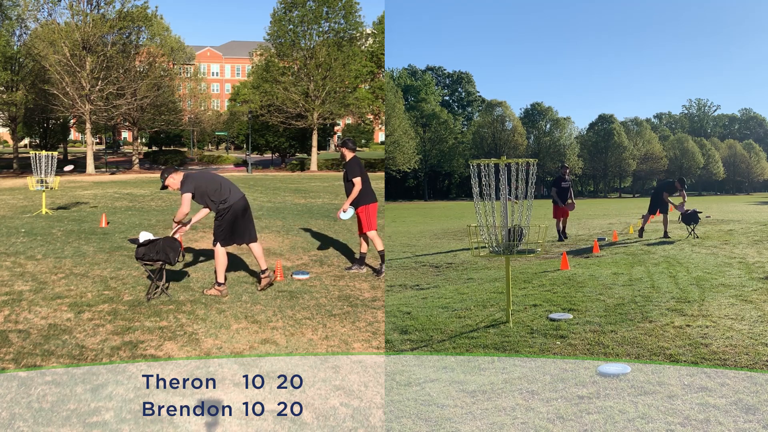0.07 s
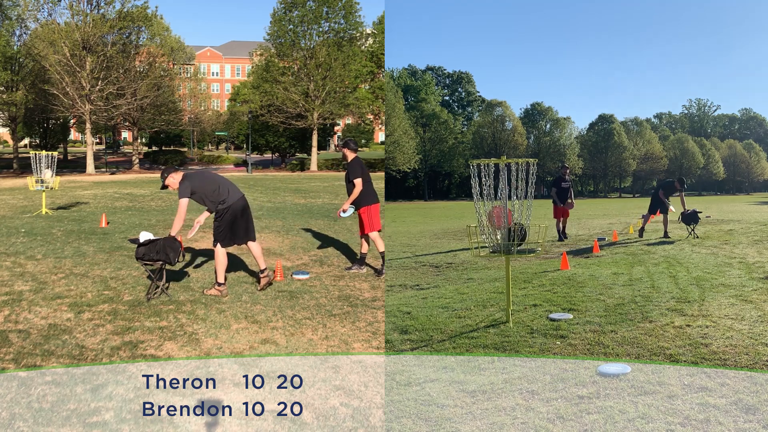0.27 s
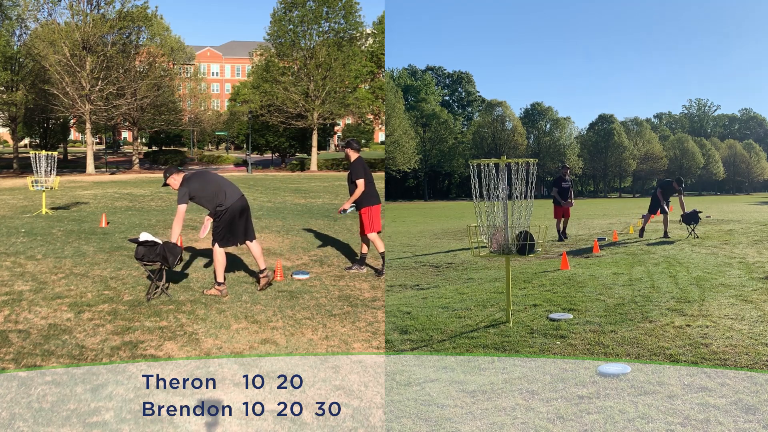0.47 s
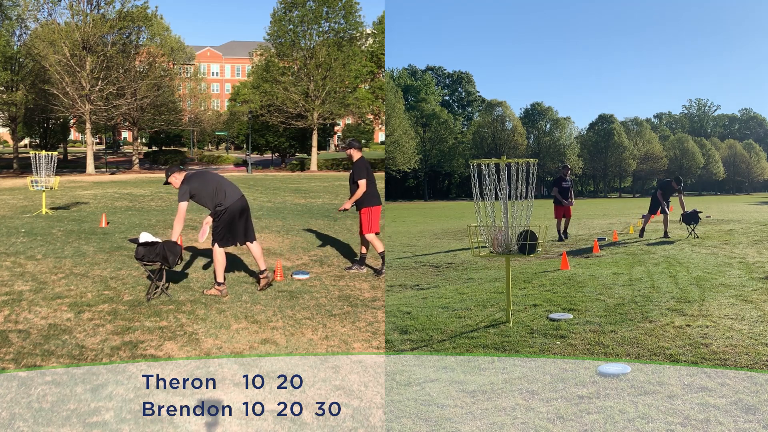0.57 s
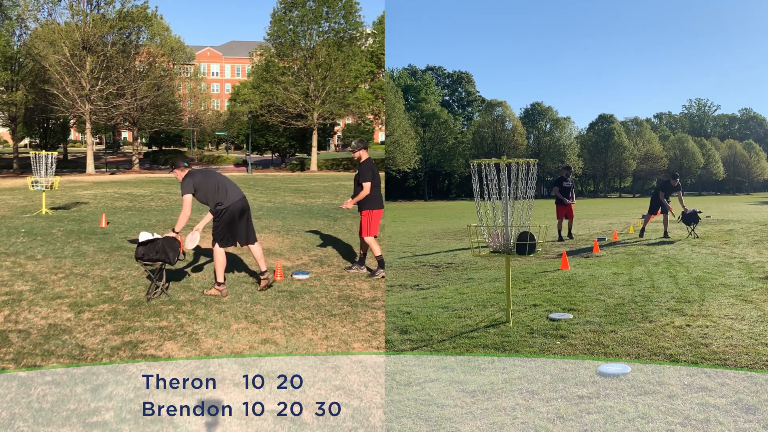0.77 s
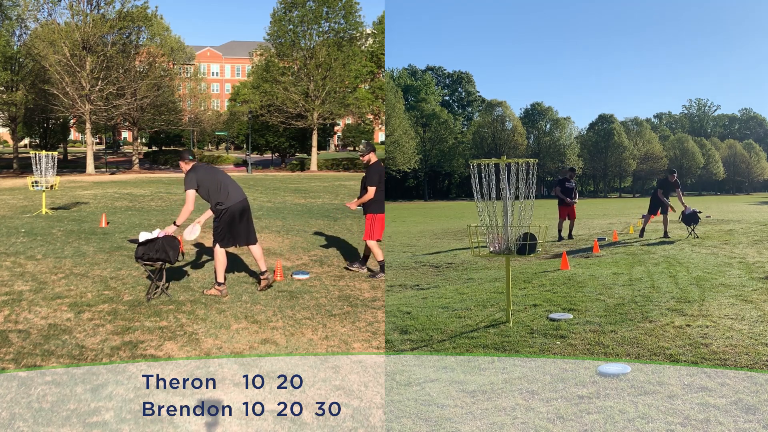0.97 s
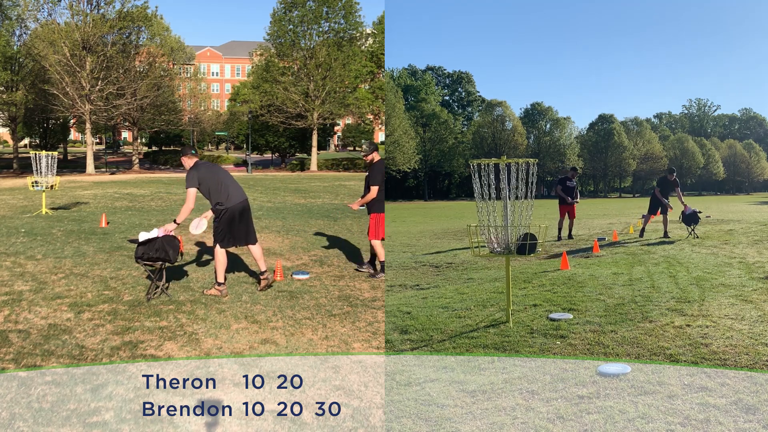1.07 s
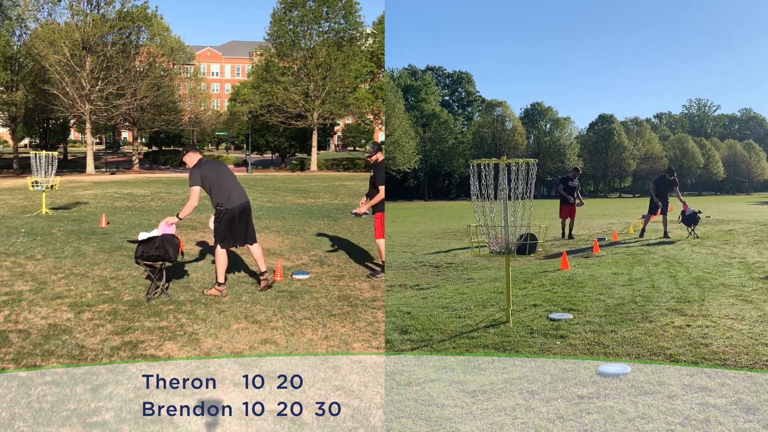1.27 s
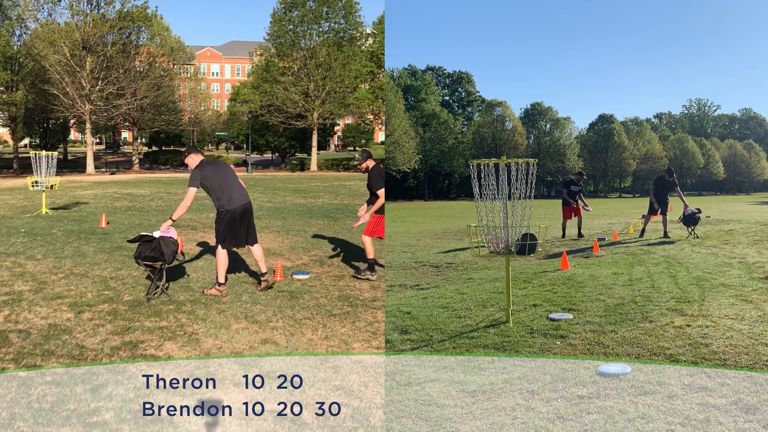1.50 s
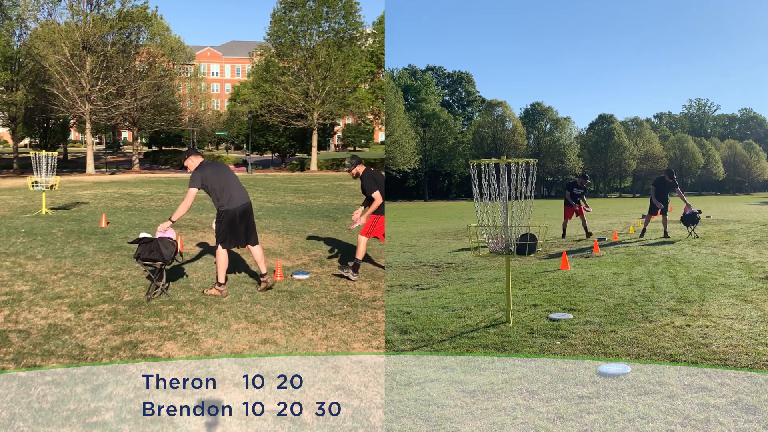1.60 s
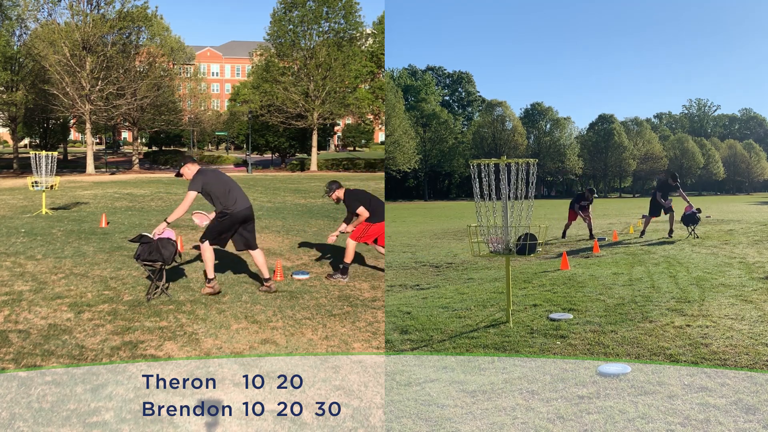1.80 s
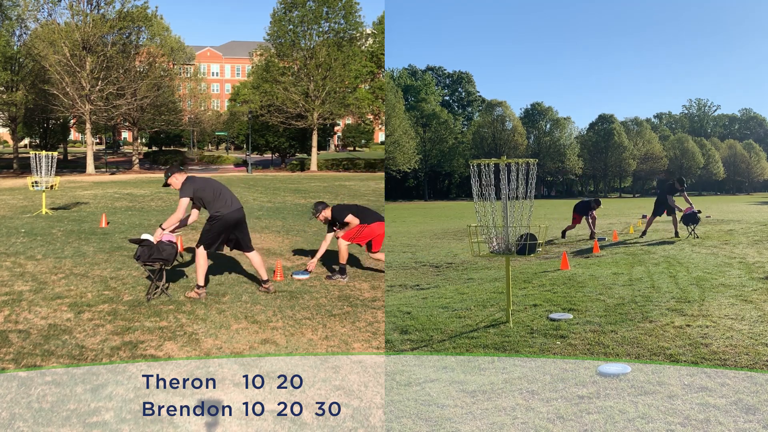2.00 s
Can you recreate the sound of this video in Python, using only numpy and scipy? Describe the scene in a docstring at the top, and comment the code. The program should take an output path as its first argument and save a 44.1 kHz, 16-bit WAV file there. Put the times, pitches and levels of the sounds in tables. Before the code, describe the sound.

A plastic disc crashes into the chains of a disc golf basket, making the steel pole ring. It drops into the tray with dull knocks as the jingling thins to single clinks, over a low park rumble.

```python
"""An open park, with a low rumble, a faint bird and feet scuffing the grass.
A plastic disc flies into the hanging chains of a disc golf basket and drives them against the steel
pole, whose closely spaced modes beat as they decay. The disc drops into the tray with damped knocks.
Each collision of links gives a click and a short ring; the chains jingle, then settle into single clinks."""
import sys
import numpy as np
from scipy import signal
from scipy.fft import rfft, irfft, next_fast_len
from scipy.io import wavfile
from scipy.ndimage import uniform_filter1d

SR = 44100
rng = np.random.default_rng(int(sys.argv[2]) if len(sys.argv) > 2 else 0)


def put_to_file(sound):
    """Save the sound as 16-bit audio at rate SR, in the file named by the first command-line argument."""
    columns = np.atleast_2d(sound).T  # one column per channel
    safe = np.clip(columns, -1, 1)
    whole_steps = np.round(safe * 32767)
    wavfile.write(sys.argv[1], SR, whole_steps.astype(np.int16))


N = 90404

# spectra of the park, grass underfoot, disc on chains, disc on tray and steel on steel (f/Hz, gain/dB)
PARK_SPECTRUM = [(20, -73), (35, -11), (55, 2.5), (80, -1), (120, 0), (170, -8.5), (250, -17.5),
                 (420, -23.5), (800, -17.5), (1100, -18.5), (1600, -26), (2500, -32), (4000, -38.5),
                 (7000, -53), (16000, -56.5)]
GRASS_SPECTRUM = [(200, -20), (900, 5), (2200, 0), (4000, -1.5), (7500, 1), (10000, -8.5), (16000, -24)]
DISC_SPECTRUM = [(100, -11.5), (300, -8), (430, -22.5), (700, -2), (950, -2), (1300, -11), (1800, -4.5),
                 (2400, -10.5), (3200, -12), (8000, -13), (16000, -74)]
TRAY_SPECTRUM = [(100, -24), (230, -1), (350, -1), (500, -11.5), (750, -1), (1000, 1), (1400, -8),
                 (2200, -2), (3200, -21), (8000, -30), (16000, -31)]
STEEL_SPECTRUM = [(200, -21), (450, -19.5), (900, -5.5), (1500, -9), (2200, 0), (2900, -10.5), (3700, -3),
                  (5000, -10.5), (6500, 1.5), (8200, -0.5), (9600, -7.5), (12000, -1), (13000, -13),
                  (15000, -9), (16000, -7.5)]
# stereo width of the rumble (f/Hz, side over mid/dB)
PARK_WIDTH = [(40, -38), (130, -19.5), (300, -14), (1000, -5), (3000, 1), (10000, -25)]
# bird notes (t/s, duration/s, start f/Hz, end f/Hz, level/dB)
BIRD_NOTES = [(0.022, .045, 2600, 3270, -60.5), (0.11, 0.018, 5700, 4660, -62),
              (0.134, 0.038, 3730, 3390, -61.5), (0.192, 0.047, 3910, 4200, -61)]
# shoes brushing the grass (peak t/s, rise/s, fall/s, level/dB)
FOOT_SCUFFS = [(1.299, 0.027, 0.073, -54.5), (1.58, 0.031, 0.063, -48.5), (1.864, 0.016, 0.035, -57.5)]
# blows of the disc on chains and pole, then in the tray (t/s, level/dB)
DISC_BLOWS = [(.219, -24), (.226, -29), (.234, -21.5), (.244, -25), (.275, -21.5), (.282, -40), (.29, -34),
              (.301, -35), (.33, -20), (.337, -35.5), (.383, -31.5)]
TRAY_BLOWS = [(.494, -38), (.566, -36.5), (.658, -41.5), (.735, -43), (.757, -54), (.83, -38.5),
              (.875, -34.5), (.957, -42)]
# chains striking the pole (t/s, strength/dB)
POLE_SLAMS = [(.282, -3.5), (0.306, -6.5)]
# normal modes of the pole and of a chain link (f/Hz, relative level/dB, T60/s)
POLE_MODES = [(1915, -33.5, .8), (1938, -35, 2.3), (1949, -33, .6), (1967, -33, .45), (1995, -29, .14),
              (2040, -31, .3), (2546, -40, .25), (5399.5, -20, .86), (5448, -22, .66), (5470, -33, .45),
              (5491, -24.5, .38), (5534, -30, .34), (5620, -31, .18), (5761, -30, .16), (6207, -31, .15),
              (6537, -29, .17), (7788, -29, .13), (8132, -29, .13), (10328, -25, .17), (10369, -22, .15),
              (10401, -28, .15), (10490, -26, .18)]
LINK_MODES = [(3980, -18.5, 0.1), (6546, -8.5, 0.098), (7300, -16, 0.047), (10305, -13.5, .08),
              (11300, -22, 0.028), (13600, -17, 0.049), (15100, -7.5, 0.052)]
# single links heard above the jingle (t/s, ring level/dB, click level/dB)
LINK_CLINKS = [(.409, -35, -32), (.44, -55, -37), (.467, -35, -35), (.508, -43, -51), (.55, -32.5, -39),
               (.656, -35, -52), (.713, -59, -59), (.733, -34, -47), (.783, -40, -54), (0.866, -45, -41),
               (.906, -41, -26), (.985, -36, -58), (1.036, -53, -30), (1.057, -36.5, -34.5),
               (1.12, -46, -34), (1.159, -40, -37), (1.21, -53, -35.5), (1.248, -46, -41),
               (1.265, -69, -66), (1.281, -63, -39), (1.32, -63.5, -55), (1.355, -49, -45),
               (1.425, -48, -51), (1.453, -48, -57), (1.489, -36, -42), (1.538, -48, -62),
               (1.562, -50.5, -56), (1.72, -60.5, -72), (1.767, -51, -44), (1.796, -48, -57.5),
               (1.892, -37.5, -51), (1.908, -39, -37.5), (1.931, -43.5, -47), (1.965, -55, -57)]
# how hard the chains are shaken (t/s, level/dB)
CHAIN_SHAKING = [(.217, -75), (.22, -29), (0.234, -23.5), (.278, -30), (.284, -15), (0.299, -18),
                 (0.334, -25), (.35, -33), (0.429, -44), (.51, -40), (.63, -46), (.75, -35), (.845, -43),
                 (.91, -35.5), (1.021, -46), (1.201, -52.5), (1.4, -64.5), (2.05, -69)]
# phase of the basket's direct sound (f/Hz, lead of left over right/rad)
LEFT_LEAD = [(20, 0), (1200, -0.55), (2700, 1), (3200, 4), (5000, 3.5), (5500, 4.5), (6500, 4.5), (7800, 7),
             (9400, 5), (11900, 10), (13300, 10), (15400, 12)]
# balance of the basket's direct sound (f/Hz, left over right/dB)
LEFT_BALANCE = [(500, 1), (1900, -.8), (3500, 0), (5200, -3.8), (5600, -3.8), (6300, -.5), (15000, 0)]


def amp(db):
    """Amplitude ratio: tenfold for every 20 dB."""
    return 10 ** (np.asarray(db) / 20)


def unit_rms(x):
    """Normalisation to a mean square of one."""
    return x / np.sqrt(np.mean(x ** 2) + 1e-20)


def curve_at(points, hz):
    """Interpolation on a logarithmic frequency axis."""
    f, values = np.transpose(points)
    return np.interp(np.log(hz + 1), np.log(f + 1), values)


def filtered(x, response):
    """Linear filtering: the spectrum is multiplied by a frequency response."""
    size = next_fast_len(N + SR // 4)
    return irfft(rfft(x, size) * response(np.fft.rfftfreq(size, 1 / SR)), size)[..., :N]


def coloured(x, spectrum, size=2048):
    """Convolution with a minimum-phase response of unit energy."""
    cepstrum = irfft(np.log(amp(curve_at(spectrum, np.fft.rfftfreq(size, 1 / SR)))))
    cepstrum[1:size // 2] *= 2
    cepstrum[size // 2 + 1:] = 0
    impulse = irfft(np.exp(rfft(cepstrum)))
    return signal.fftconvolve(x, impulse / np.linalg.norm(impulse))[:N]


def placed(times, sounds):
    """Superposition of short sounds, one a row, each at its onset."""
    at = (np.asarray(times) * SR).astype(int)[:, None] + np.arange(sounds.shape[1])
    return np.bincount(at.ravel(), sounds.ravel(), N)[:N]


def park(rumble_db=-44, hum_db=-54.5, hum_hz=117.53):
    """Distant rumble, nearly coherent between the channels in the bass, and a narrow-band hum."""
    noise = filtered(rng.standard_normal((2, N)), lambda hz: amp(curve_at(PARK_SPECTRUM, hz)))
    mid = noise[0]
    side = filtered(noise[1], lambda hz: amp(curve_at(PARK_WIDTH, hz)))
    rumble = unit_rms(np.array([mid + side, mid - side]))
    hum = unit_rms(filtered(rng.standard_normal(N), lambda hz: np.exp(-((hz - hum_hz) / 3) ** 2)))
    return (amp(rumble_db) * rumble + amp(hum_db) * hum) * amp([[-.5], [.5]])


def bird():
    """Frequency modulation: far whistles glide and level off."""
    t = np.arange(N) / SR
    song = np.zeros(N)
    for onset, duration, start_hz, end_hz, db in BIRD_NOTES:
        progress = np.clip((t - onset) / duration, 0, 1)
        hz = end_hz + (start_hz - end_hz) * (1 - progress) ** 2
        song += amp(db) * np.sin(np.pi * progress) * np.sin(2 * np.pi * np.cumsum(hz) / SR)
    return song


def scuffs():
    """Friction of shoes on grass gives swells of grainy noise."""
    t = np.arange(N) / SR
    swell = sum(amp(db) * np.exp(np.where(t < peak, -((t - peak) / rise) ** 2, -abs(t - peak) / fall))
                for peak, rise, fall, db in FOOT_SCUFFS)
    noise = rng.standard_normal((2, N))
    grain_db = 1.8 * unit_rms(uniform_filter1d(rng.standard_normal(N), size=40))
    return swell * unit_rms(filtered(noise * amp(grain_db), lambda hz: amp(curve_at(GRASS_SPECTRUM, hz))))


def scatter(x, wet_db, t60):
    """Scattering from ground and trees adds a weak diffuse tail."""
    t = np.arange(SR // 2) / SR
    tail = rng.standard_normal((2, len(t))) * amp(-60 * t / t60)
    return amp(wet_db) * signal.fftconvolve(x[None], tail / np.linalg.norm(tail[0]), axes=1)[:, :N]


def disc_knocks(blows, spectrum, t60):
    """Heavy damping in the plastic makes each blow a dull burst of noise."""
    onsets, db = np.transpose(blows)
    t = np.arange(SR // 10) / SR
    bursts = amp(db[:, None] - 60 * t / t60) * rng.standard_normal((len(onsets), len(t)))
    return coloured(placed(onsets, bursts), spectrum)


def pole(rise_s=.00079):
    """Free vibration: each slam excites clusters of close modes, which beat and decay."""
    t = np.arange(N) / SR
    phase_time = t - POLE_SLAMS[-1][0]  # common to the slams, so they add in phase
    ring = np.zeros(N)
    for onset, strength_db in POLE_SLAMS:
        age = np.maximum(t - onset, 0)
        modes = sum(amp(db - 60 * age / t60) * np.sin(2 * np.pi * hz * phase_time)
                    for hz, db, t60 in POLE_MODES)
        ring += amp(strength_db) * modes * (1 - np.exp(-age / rise_s))
    return np.sqrt(2) * ring


def link_contacts(times, ring_db, click_db, detuning=.012, click_t60=.0062, sizzle_t60=.06):
    """Impact excitation: each contact gives a broadband click and rings the modes of one link."""
    t = np.arange(3400) / SR
    deviates = rng.standard_normal((len(times), len(LINK_MODES), 2))
    ring = np.zeros((len(times), len(t)))
    for k, (hz, db, t60) in enumerate(LINK_MODES):
        mode_hz = hz * (1 + detuning * deviates[:, k, :1])
        mode_db = db + 4 * deviates[:, k, 1:]
        ring += amp(mode_db - 60 * t / t60) * np.sin(2 * np.pi * mode_hz * t)
    early = t[:len(t) // 2]
    sizzle = amp(-11.5 - 60 * early / sizzle_t60)  # dense weak modes, treated as noise
    envelope = amp(-60 * early / click_t60) + sizzle
    click = amp(-3.5) * envelope * rng.standard_normal((len(times), len(early)))
    clicks = coloured(placed(times, amp(click_db)[:, None] * click), STEEL_SPECTRUM)
    return placed(times, amp(ring_db)[:, None] * ring) + clicks


def clinks(count=3, span_s=.0049, fade_db=5.5):
    """Chatter: a swinging link rebounds from its neighbour, more weakly each time."""
    onsets, ring_db, click_db = np.transpose(LINK_CLINKS)[:, :, None]
    progress = np.arange(count) / count
    times = onsets + span_s * progress * rng.uniform(.7, 1.3, (len(onsets), count))
    loss_db = fade_db * progress
    return link_contacts(times.ravel(), (ring_db - loss_db).ravel(), (click_db - loss_db).ravel())


def jingle(reference_db=-30, reference_per_s=900, db_per_decade=45):
    """Incoherent sum of random collisions: harder shaking makes them denser and louder."""
    shake_s, shake_db = np.transpose(CHAIN_SHAKING)
    t = np.arange(N) / SR
    level_db = np.interp(t, shake_s, shake_db)
    vigour_db = level_db - reference_db
    rate = reference_per_s * 10 ** (np.minimum(vigour_db, 10) / db_per_decade) * (t > shake_s[0])
    contacts_so_far = np.cumsum(rate) / SR
    count = int(contacts_so_far[-1])
    at = np.searchsorted(contacts_so_far, np.arange(count) + rng.random(count))
    spread_db = 2.5 * np.clip(rng.standard_normal(count), -2, 1)
    share_db = 10 * np.log10(reference_per_s / rate[at])  # the contacts share the power
    click_db = level_db[at] + spread_db + share_db
    ring_db = click_db - 8.5 - .12 * vigour_db[at]  # gently shaken links ring more freely
    return link_contacts(at / SR, ring_db, click_db)


def scene():
    """Superposition of the basket, located by phase and level cues, its scatter and the park."""
    rattle = jingle() + clinks()
    rattle += disc_knocks(DISC_BLOWS, DISC_SPECTRUM, t60=.024)
    rattle += disc_knocks(TRAY_BLOWS, TRAY_SPECTRUM, t60=.056)
    sides = np.array([[.5], [-.5]])  # left, right
    direct = filtered(rattle + pole(), lambda hz: amp(sides * curve_at(LEFT_BALANCE, hz))
                      * np.exp(1j * sides * curve_at(LEFT_LEAD, hz)))
    diffuse = scatter(rattle, wet_db=-12, t60=.017) + scatter(rattle, wet_db=-10, t60=.22)
    return direct + diffuse + scuffs() + bird() + park()


def record(dry, cutoff_hz=15640):
    """Band limiting: a steep low-pass removes the highest treble."""
    return filtered(dry, lambda hz: 1 / np.sqrt(1 + (hz / cutoff_hz) ** 300))


dry = scene()
out = record(dry)
put_to_file(out)
```